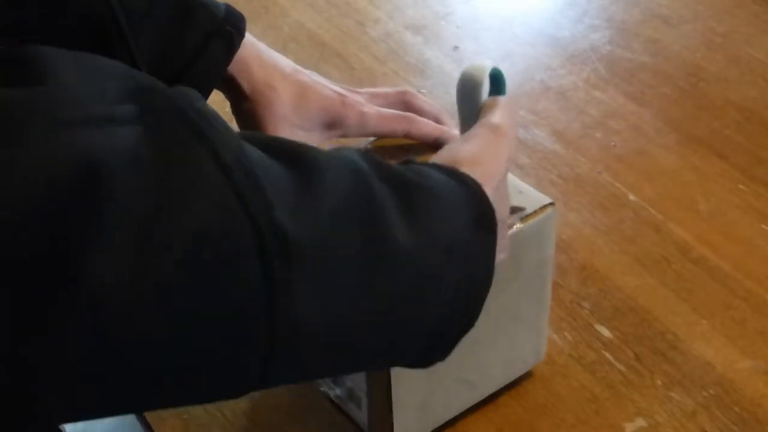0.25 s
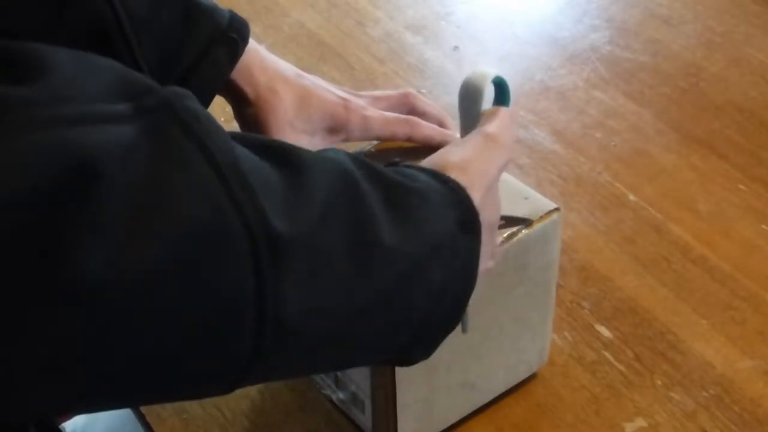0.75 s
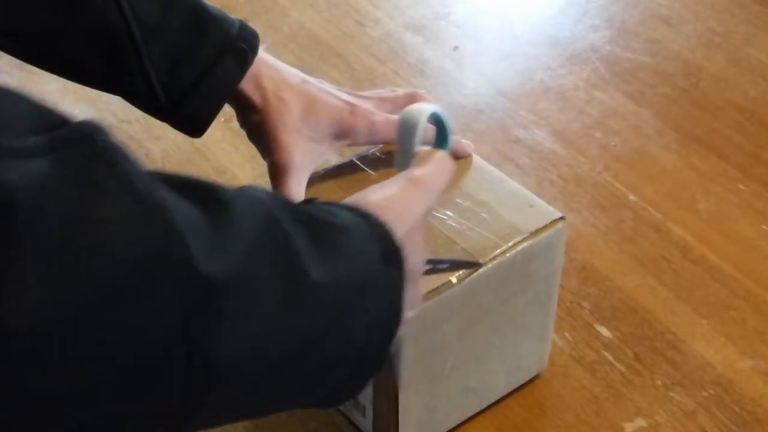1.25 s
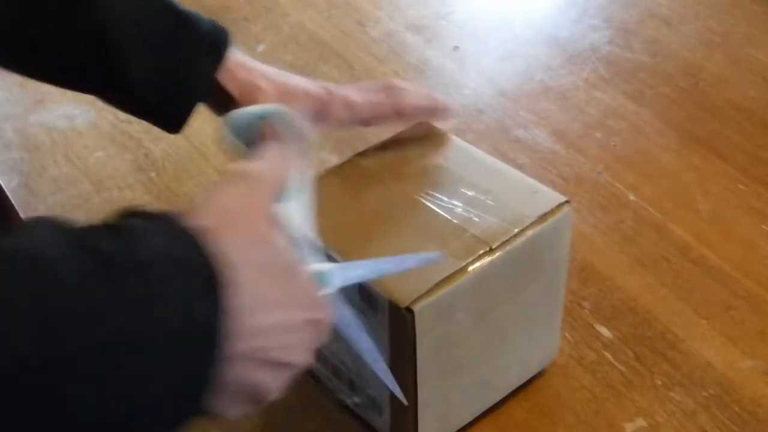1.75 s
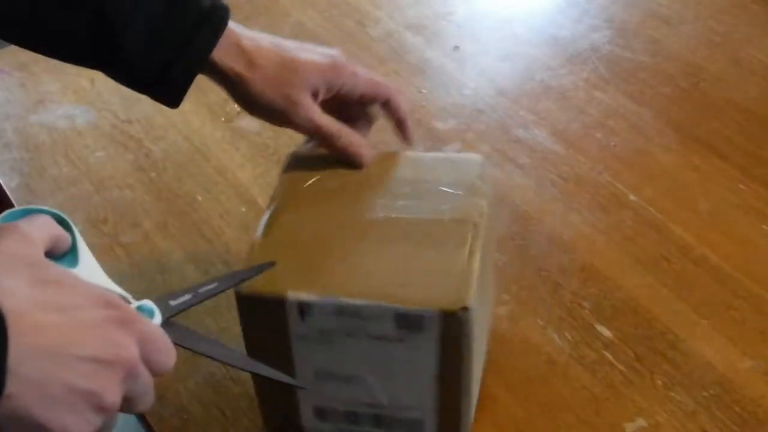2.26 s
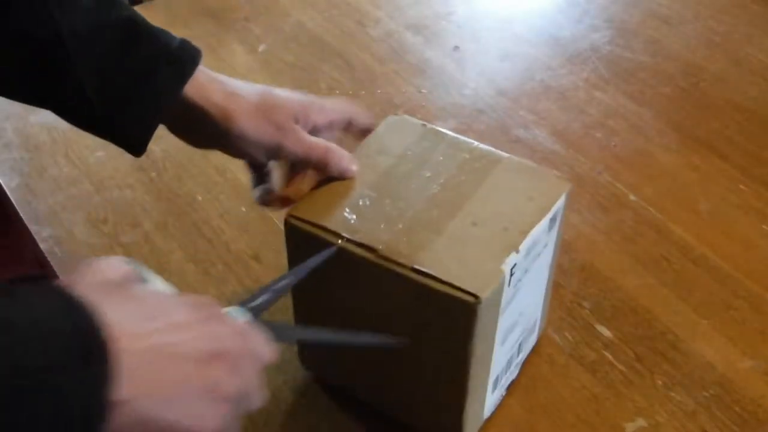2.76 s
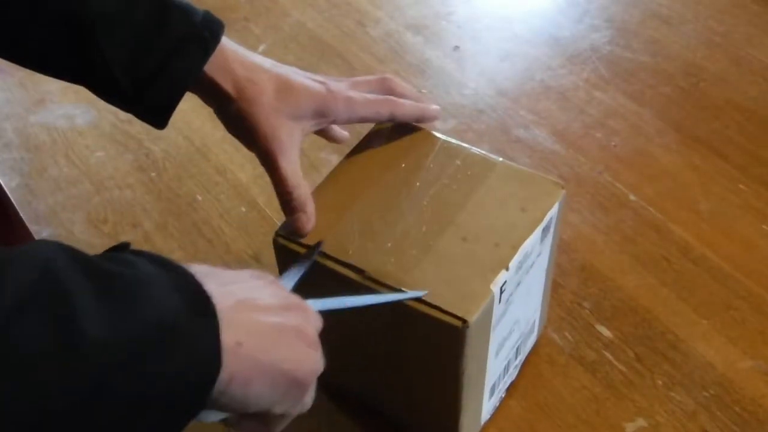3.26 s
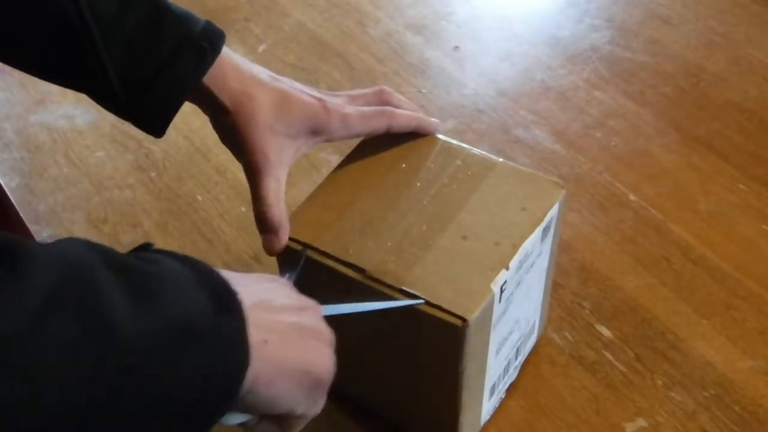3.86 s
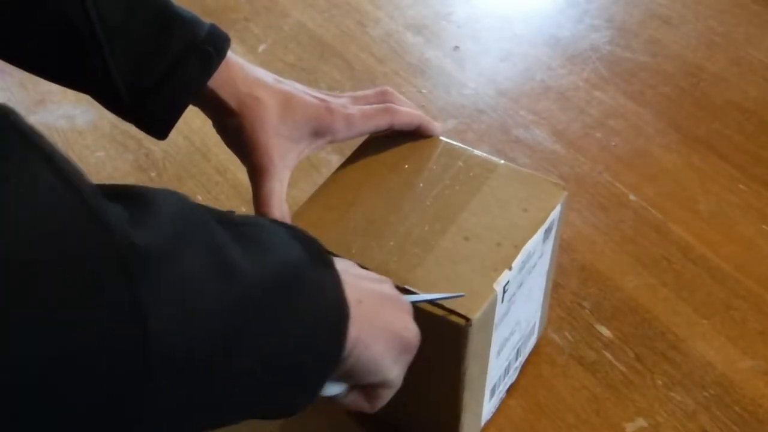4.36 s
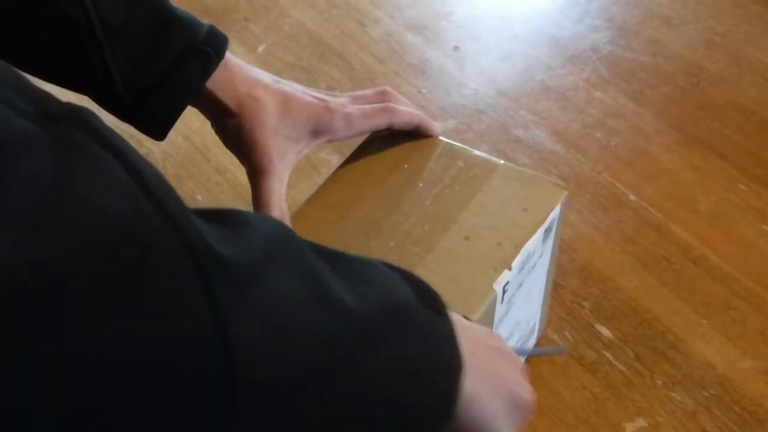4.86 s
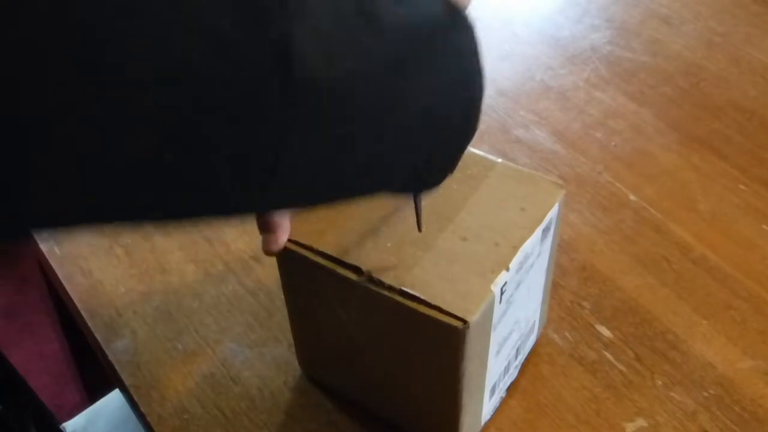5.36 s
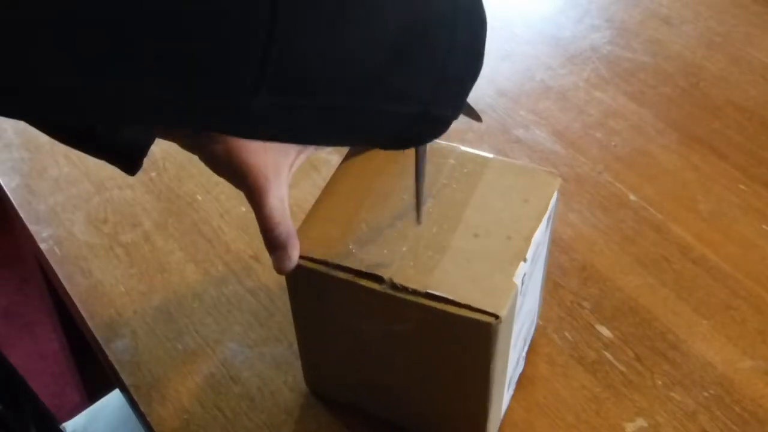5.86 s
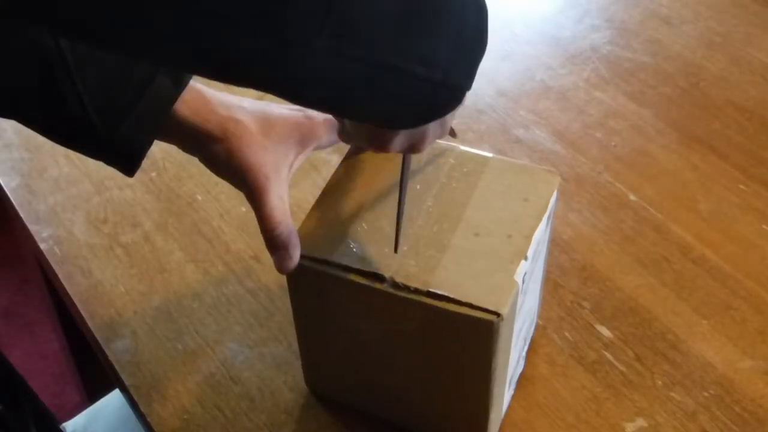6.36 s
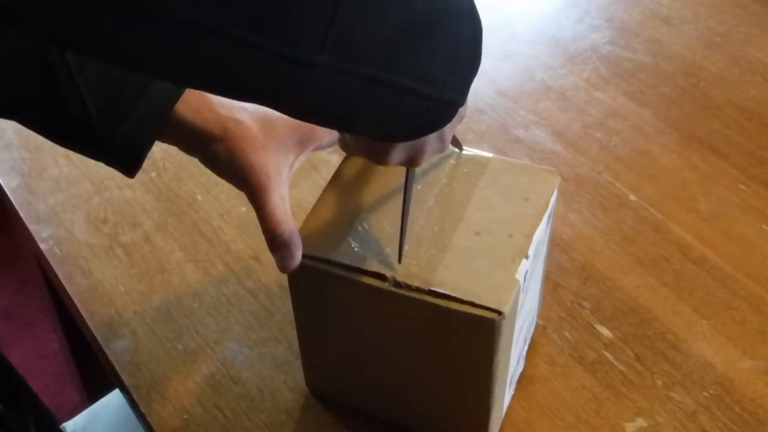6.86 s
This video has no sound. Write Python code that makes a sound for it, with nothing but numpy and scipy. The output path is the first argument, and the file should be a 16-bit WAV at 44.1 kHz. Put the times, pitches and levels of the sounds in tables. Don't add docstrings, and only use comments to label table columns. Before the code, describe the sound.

A scissor blade works through tape on a small hollow carton on a wooden table. Faint rubs, then a crackling slit ending in bright snaps; the box is turned with papery rustling; a lone sharp snap, a harder burst of cuts, a quiet gap, and a last jerky cut. Close small camera microphone, small indoor room, faint hum.

```python
import sys
import numpy as np
from scipy import signal
from scipy.fft import rfft, irfft
from scipy.io import wavfile
from scipy.ndimage import uniform_filter1d

SR = 44100
rng = np.random.default_rng(int(sys.argv[2]) if len(sys.argv) > 2 else 0)


def pcm_store(signal):
    levels = np.round(np.clip(np.atleast_2d(signal), -1, 1) * 32767)
    wavfile.write(sys.argv[1], SR, levels.astype(np.int16).T)


def linear_from_db(decibels):
    return 10 ** (np.asarray(decibels, float) / 20)


N = 313551
GAIN_STEP = 64


def evened(x):
    return x / np.sqrt(np.mean(x ** 2) + 1e-20)


def read(points, hz):
    point_hz, value = np.transpose(points)
    return np.interp(np.log(hz + 1), np.log(point_hz + 1), value)


def add(mix, start_s, sound):
    part = mix[round(start_s * SR):][:len(sound)]
    part += sound[:len(part)]


def colour(x, points):
    hz = abs(np.fft.fftfreq(4096, 1 / SR))
    log_gain = np.log(linear_from_db(np.maximum(read(points, hz), -100)))
    delay_phase = signal.hilbert(log_gain).imag
    taps = np.fft.ifft(np.exp(log_gain - 1j * delay_phase)).real[:2048]
    return signal.oaconvolve(x, taps / np.linalg.norm(taps))[:len(x)]


def resonate(x, hz, width):
    turn = np.exp(2j * np.pi * np.cumsum(hz * np.ones(len(x))) / SR)
    r = np.exp(-np.pi * width / SR)
    smoothed = signal.lfilter([1 - r], [1, -r], x / turn + 1e-18)
    return 2 * (turn * smoothed).real


def resonate_twice(x, hz, width):
    return resonate(resonate(x, hz, width), hz, width)


def body(x, modes):
    return evened(sum(linear_from_db(db) * resonate_twice(x, hz, 1.48 * width) for hz, width, db in modes))


def slips(per_s, spread_db, ring_ms, smooth):
    size = linear_from_db(spread_db * np.minimum(rng.exponential(1, N), 3))
    size = size * (rng.random(N) < per_s / SR)
    swelling = signal.lfilter([.1], [1, -.9], size)
    puffs = signal.lfilter([1], [1, -np.exp(-1000 / (SR * ring_ms))], swelling)
    return (evened(puffs) + smooth) * rng.standard_normal(N)


def wander(count, span):
    once = uniform_filter1d(rng.standard_normal(count), span)
    return evened(uniform_filter1d(once, span))


def moving(drive, modes):
    rings = []
    for hz, width, db in modes:
        drifting_hz = hz * (1 + .025 * wander(len(drive), span=3000))
        flickering_db = db + 3.0 * wander(len(drive), span=900)
        rings.append((drifting_hz, width, flickering_db))
    return body(drive, rings)


def stroke_gain(rows, column):
    t, rows = np.arange(N) / SR, np.array(rows)
    db = np.full(N, -100.)
    inside = (t >= rows[0, 0]) & (t <= rows[-1, 0])
    db[inside] = np.interp(t[inside], rows[:, 0], rows[:, column])
    return linear_from_db(uniform_filter1d(db, 200))


def swell(peak_s, db, rise_s, fall_s):
    t = np.arange(0, N + GAIN_STEP, GAIN_STEP) / SR - peak_s
    return linear_from_db(db - 20 * np.maximum(-t / rise_s, t / fall_s))


def swipe(start_s, length_s, first_db, last_db):
    touch_s, lift_s = 0.032, 0.062
    t = np.arange(0, N + GAIN_STEP, GAIN_STEP) / SR - start_s
    edge = np.maximum(np.maximum(-t / touch_s, (t - length_s) / lift_s), 0)
    slide_db = np.interp(t, [0, max(length_s, .01)], [first_db, last_db])
    return linear_from_db(slide_db - 20 * edge)


def together(gains):
    total = np.linalg.norm(gains, axis=0)
    return np.interp(np.arange(N) / GAIN_STEP, np.arange(gains.shape[1]), total)


# pitch_hz, level_db (per Hz)
ROOM_TONE = [(12, -45), (20, 0.0), (137, -4.5), (202, -5.0), (266, -5.5), (333, -8.0), (478, -10.5),
             (534, -9.5), (857, -12.0), (1670, -9.5), (2090, -18), (3640, -17.5), (5850, -19.5),
             (15500, -23.5), (17000, -29.0)]
# pitch_hz, width_hz, level_db
CAMERA_WHIRR = [(1237, 130, -2), (1643, 160, -2.5), (3458, 120, -10)]


def room_hum():
    air_db, whirr_db = -59, -66
    hz = np.fft.rfftfreq(N, 1 / SR)
    air = irfft(rfft(rng.standard_normal(N)) * linear_from_db(read(ROOM_TONE, hz)), N)
    return linear_from_db(air_db) * evened(air) + linear_from_db(whirr_db) * body(rng.standard_normal(N), CAMERA_WHIRR)


# pitch_hz, time_to_fall_60_db_s
ROOM_DECAY = [(200, 0.39), (1500, 0.25), (8000, 0.19)]


def room_echo(x):
    taps = np.zeros(SR // 2)
    at = np.arange(150, SR // 2 - 20, 20)
    taps[at + rng.integers(0, 20, len(at))] = rng.choice([-1., 1.], len(at))
    hz, t, z = signal.stft(taps, SR, nperseg=128)
    fading = linear_from_db(-60 * t / read(ROOM_DECAY, hz)[:, None])
    tail = signal.istft(z * fading, SR, nperseg=128)[1]
    return signal.fftconvolve(x, tail / np.linalg.norm(tail))[:N]


# peak_s, level_db, rise_s, fall_s, upper_mode_db (against the low mode)
LEANS = [(.2, -54.5, 0.093, 0.09, -14), (.45, -61, 0.12, 0.068, -1), (.9, -60, 0.17, 0.6, 6),
         (1.424, -52, 0.55, .2, 2), (2.15, -59, 0.31, 0.26, -12), (2.35, -80, 0.27, 1.5, 12.5),
         (3.08, -59, 0.096, 0.14, -7), (3.714, -63, 0.092, 0.26, -22), (3.934, -81.5, 0.29, 0.53, 20),
         (4.14, -54.5, 0.028, 0.24, -2), (4.592, -58, 0.35, 0.23, 4), (4.906, -54, 0.086, 0.16, 3),
         (5.1, -85.5, 0.33, 0.83, 22.5), (7.12, -50.5, 0.28, .1, 4), (6.6, -75, .7, .4, 5)]
# pitch_hz, width_hz
TABLE_MODES = [(112, 16.3), (235, 18.6)]


def table_top():
    shake = slips(per_s=30, spread_db=2.0, ring_ms=20, smooth=2.5)
    leans = np.array([swell(*row[:4]) for row in LEANS])
    upper_leans = leans * linear_from_db(np.array(LEANS)[:, 4:])
    gains = together(leans), together(upper_leans)
    return sum(gain * body(shake, [(hz, width, 0)]) for gain, (hz, width) in zip(gains, TABLE_MODES))


# start_s, peak_db, pitch_hz, time_to_fall_60_db_s
KNOCKS = [(0.141, -43, 292, 0.044), (0.382, -43, 203, 0.012), (0.814, -44, 244, 0.061),
          (1.411, -33.5, 234, 0.082), (3.0526, -35.5, 476, 0.044), (4.262, -49.5, 359, 0.14),
          (3.697, -49, 108, 0.24), (4.1228, -34.5, 197, 0.066), (4.433, -50, 337, 0.17),
          (6.658, -43.5, 515, 0.024), (6.8426, -38, 392, 0.014), (6.925, -34.5, 488, 0.031)]


def knocks():
    out, t = np.zeros(N), np.arange(9000) / SR
    stretches = rng.uniform(0.85, 0.91, (len(KNOCKS), 3))
    for (start_s, db, hz, t60_s), stretch in zip(KNOCKS, stretches):
        ring = np.sin(2 * np.pi * hz * t) * linear_from_db(-60 * t / t60_s)
        for ratio, share in zip(stretch * [1.45, 2.2, 3.3], [.3, .25, .15]):
            ring += share * np.sin(2 * np.pi * hz * ratio * t) * linear_from_db(-60 * ratio * t / t60_s)
        add(out, start_s, linear_from_db(db) * ring * np.minimum(t / 0.00051, 1))
    return out


# start_s, length_s, first_db, last_db, cardboard_db (against rustle)
RUBS = [(0.0, 0.43, -70, -66, 2), (.222, .004, -67, -68, 2), (.25, .004, -66, -68, -20),
        (0.753, .004, -63, -68, -20), (0.502, 0.3, -80, -73, 7), (.8, .08, -55, -58, -20),
        (1.625, 0.061, -48, -50, -9.5), (1.69, 0.03, -43, -52, -17), (1.767, 0.18, -56, -64, -22),
        (2.013, 0.041, -60, -65, 1.5), (2.064, 0.074, -49.5, -51, -8.5), (2.159, 0.077, -47.5, -49.5, -9),
        (2.269, 0.24, -53.5, -47.5, -8), (2.533, 0.094, -61, -51.5, -6), (2.637, 0.091, -55, -56, -11),
        (2.77, 0.15, -63.5, -68, -12), (3.048, 0.04, -57.5, -68, -1), (3.151, 0.021, -56.5, -66, -5.5),
        (3.317, 0.041, -59, -59, -23), (3.367, 0.11, -65, -56.5, -10), (3.692, 0.083, -51, -81, 0),
        (3.86, 0.067, -65, -66, -4), (3.955, 0.035, -59.5, -59, -8), (3.995, .03, -59, -68, -2),
        (4.05, 0.045, -64, -66, -7), (4.122, 0.053, -50, -62.5, -0.5), (4.235, 0.23, -57.5, -70, -1),
        (4.988, 0.096, -52.5, -61.5, -7), (5.104, 0.11, -58.5, -60, -7.5), (5.2, 0.19, -60, -66.5, -8),
        (5.418, 0.24, -55, -61.5, -6)]
# peak_s, sheen_db, rise_s, fall_s
FAST_SWIPES = [
    (2.48, -58, 0.17, 0.042),
    (3.155, -64, .04, .04),
    (3.35, -62, .08, .1),
    (4.47, -60, 0.045, 0.16),
    (4.748, -58, 0.018, .05),
]
# time_s, pitch_hz
BRIGHT_PEAK = [(0, 5500), (2.2, 5930), (2.5, 5170), (2.75, 6050), (7.12, 6040)]
# pitch_hz, level_db (per Hz)
RUSTLE = [(1470, -26.5), (2500, -6), (4450, -3), (4810, -0.5), (6190, 0.5), (7820, -5), (10500, -11.5),
          (13600, -22), (22000, -120)]
# pitch_hz, level_db (per Hz)
SHEEN = [(7500, -40), (9000, -8), (12000, -12), (14500, -13), (16500, -12)]
# pitch_hz, level_db (per Hz)
SCUFF = [(180, -36.5), (300, 0), (337, 0.5), (895, -6.5), (1240, 2), (2600, -11.5), (3380, -31),
         (5720, -120)]


def rubbing():
    drive = slips(per_s=1300, spread_db=3.0, ring_ms=1.9, smooth=1.0)
    peak_hz = np.interp(np.arange(N) / SR, *np.transpose(BRIGHT_PEAK))
    peak = evened(resonate(drive, peak_hz, 940))
    rustle = evened(evened(colour(drive, RUSTLE)) + 0.5 * peak)
    swipes = np.array([swipe(*row[:4]) for row in RUBS])
    rub_gain = together(swipes)
    scuff_gain = together(swipes * linear_from_db(np.array(RUBS)[:, 4:]))
    sheen_gain = linear_from_db(-77) * (rub_gain / linear_from_db(-55)) ** 0.6
    sheen_gain = sheen_gain + together(np.array([swell(*row) for row in FAST_SWIPES]))
    sheen = sheen_gain * evened(colour(drive, SHEEN))
    scuff = scuff_gain * evened(colour(drive, SCUFF))
    return rub_gain * rustle + sheen + scuff


# start_s, length_s, slip_rate_hz, level_db
SQUEAK = (2.064, .018, 580, -46)


def squeak():
    start_s, length_s, slip_hz, db = SQUEAK
    t = np.arange(round(length_s * SR)) / SR
    turns = slip_hz * t
    tone = np.sin(2 * np.pi * turns)
    tone += 1.2 * np.sin(4 * np.pi * turns + 1)
    tone += .3 * np.sin(6 * np.pi * turns)
    hiss = colour(np.exp(-4 * (turns % 1)) * rng.standard_normal(len(t)), RUSTLE)
    judder = evened(tone) * np.hanning(len(t)) * 1.35 + evened(hiss)
    out = np.zeros(N)
    add(out, start_s, linear_from_db(db) * judder * signal.windows.tukey(len(t), .4))
    return out


# peak_s, peak_db, fade_ms, pitch_hz, width_hz
SINGS = [(1.02, -58, 50, 6200, 500), (1.2, -53.5, 80, 4800, 450), (1.2, -62, 55, 5740, 398),
         (1.285, -62, 35, 10800, 600), (1.34, -58, 57, 11400, 600), (1.33, -64, 80, 12700, 550),
         (1.32, -66, 100, 13900, 550), (1.32, -52, 50, 5140, 450), (1.371, -54, 60, 6170, 400),
         (1.441, -52, 43, 5970, 400), (1.6, -70, 44, 9500, 800), (1.52, -60, 41, 3400, 300),
         (1.73, -55, 30, 6000, 700), (2.07, -48, 11, 1200, 249), (2.07, -59, 14, 7500, 2000),
         (2.18, -58, 41, 6530, 700), (2.225, -58, 34, 6200, 600), (3.088, -54, 28, 457, 60),
         (3.085, -61, 37, 6200, 600), (3.155, -55.5, 28, 5960, 600), (3.32, -56.5, 20, 6270, 600),
         (3.39, -58, 47, 6200, 500), (3.44, -64, 65, 5200, 700), (3.46, -63, 40, 3200, 2500),
         (4, -59, 9.4, 2200, 400), (4.945, -44, 27, 6140, 970), (7.045, -54, 35, 2700, 200),
         (6.985, -53, 25, 2630, 200), (7.04, -64, 54, 5970, 500), (7.09, -55, 51, 9200, 600)]


def singing():
    out, t = np.zeros(N), np.arange(-6000, 6000) / SR
    noises = rng.standard_normal((len(SINGS), len(t)))
    for (peak_s, db, fade_ms, hz, width), noise in zip(SINGS, noises):
        ring = evened(resonate_twice(noise, hz, width))
        add(out, peak_s + t[0], ring * linear_from_db(db - 20 * (1000 * t / fade_ms) ** 2))
    return out


# start_s, peak_db, pitch_hz, fizz_db, cardboard_db (last two against peak)
SNAPS = [(0.2857, -37, 5430, -22, -28), (0.3195, -43.5, 4180, -18, -28), (0.8132, -22.5, 5540, -26, -14),
         (0.8534, -25.5, 6650, -22, -30), (0.919, -28.5, 5600, -20, -28), (0.9874, -27, 7100, -24, -34),
         (1.1188, -32, 5500, -20, -28), (1.135, -33.5, 10800, -8, -28), (1.3645, -32, 5890, -18, -28),
         (1.412, -22, 6250, -10, -18), (1.571, -44, 6400, -24, -28), (1.6475, -16.5, 5270, -20, -10.5),
         (1.6677, -22, 5400, -19, -18), (1.6855, -18, 5800, -19, -22), (1.701, -27, 5200, -20, -16),
         (1.701, -29, 4200, -26, -4), (1.715, -19, 6350, -23, -35), (1.7593, -31, 5250, -24, -19),
         (1.7705, -20.5, 5370, -21, -34), (2.036, -50, 11000, -4, -30), (2.764, -46, 6160, -18, -28),
         (3.6818, -17, 6560, -17, -18), (3.9338, -37, 8200, -9, -28), (3.9977, -28.5, 5870, -15, -24),
         (4.0801, -40, 6160, -26, -31), (4.4047, -34.5, 6060, -5, -28), (4.4702, -29, 8100, -4, -28),
         (4.538, -18, 5970, -15, -25), (4.558, -30, 6300, -16, -12), (4.746, -35, 11500, -6, -30),
         (4.979, -25.5, 5700, -24, -28), (6.9912, -23.5, 6430, -26, -24), (7.044, -38, 9150, -22, -30)]
TICKS = [(0.052, -40.5, 6300, -24, -5.5), (0.3765, -43.5, 6060, -12, 3), (0.792, -23, 6000, -9.5, -7),
         (0.976, -30.5, 6270, -14, -10.5), (1.075, -26.5, 5900, -22, -11), (1.6535, -25.5, 5900, -8, -6),
         (1.6744, -27, 4800, -18, -3.5), (1.6873, -27, 5500, -14, -12), (1.774, -27, 5100, -22, -5.5),
         (1.8598, -35.5, 7150, -18, -9), (2.6233, -35, 5430, -20, -19), (3.0527, -36, 6100, -24, -12),
         (3.887, -45, 6070, -18, -14), (3.991, -40, 4500, -20, -5), (4.111, -41, 5500, -24, -22),
         (4.1198, -20, 6360, -12, -7.5), (4.129, -45, 6600, -26, -20), (4.45, -33, 6000, -18, -12),
         (4.468, -22.5, 6300, -10, -9), (4.4795, -26, 6200, -6, -15), (4.489, -24, 6030, -16, -11),
         (4.5072, -21.5, 6200, -4, -8), (4.5154, -26, 6300, -6, -8), (4.551, -38, 4780, -18, -4),
         (4.5636, -22, 6100, -18, -13), (4.581, -24, 5000, -6, -8), (4.6864, -31.5, 4230, -26, -8),
         (4.7343, -27, 5170, -18, -6), (4.823, -32, 7500, -22, -22), (4.844, -28, 6800, -20, -6),
         (6.484, -46, 6040, -18, -9), (6.6559, -35.5, 4700, -16, -5.5), (6.7394, -29, 5500, -6, -9),
         (6.925, -17, 6400, -16, -11), (6.9992, -20.5, 6630, -21, -15)]
BRUSHES = [(0.44, -44, 5810, -18, -1.5), (0.7366, -48, 5070, -18, -8), (0.805, -37, 5800, -26, -12),
           (0.826, -39, 6000, -26, -13), (0.868, -38, 6500, -22, -24), (0.9, -49, 5300, -24, -16),
           (1.595, -45, 6500, -20, -10), (1.634, -40, 5925, -16, -1), (1.657, -30, 4400, -22, -11),
           (1.754, -34, 6000, -8, -2.5), (2.009, -44, 5500, -20, -11), (2.0878, -32.5, 6650, -24, -14),
           (2.113, -33.5, 5800, -24, -17), (2.1527, -40, 6720, -20, -1), (2.502, -43, 5440, -22, 3.5),
           (2.6579, -37, 3500, -24, -16), (3.042, -49, 6500, -24, -20), (3.2832, -44, 5300, -18, -5),
           (3.3079, -47, 6200, -22, -14), (3.6856, -27, 7000, -22, -16), (3.6906, -27, 6400, -20, -24),
           (4.229, -44, 4480, -5, -3), (4.2474, -47, 4390, -20, -9), (4.283, -48, 6000, -14, -7),
           (4.3182, -38.5, 4950, -9, -4), (4.4422, -36, 5100, -20, -2), (4.67, -45, 6000, -24, -5),
           (4.7068, -34.5, 4650, -26, -2), (4.7942, -32, 4800, -14, -5), (4.8768, -31, 4500, -16, -7),
           (4.902, -35, 4500, -16, -5), (5.001, -40, 6860, -22, -5), (5.4153, -41, 3430, -22, -2),
           (5.4243, -36, 2330, -26, -14), (5.8667, -46.5, 4840, -20, -9), (6.674, -49, 5540, -22, -14),
           (6.752, -48, 5200, -24, -12), (6.8414, -43.5, 5500, -22, -0.5), (6.897, -50, 6500, -22, -20)]
CLICK_DECAYS = [0.65, 1.3, 2.1]
# pitch_hz, level_db (per Hz)
FILM = [(470, -43), (800, -19.5), (1820, -16.5), (2470, -16), (3300, 2.5), (4150, 1), (6380, 4.5),
        (9500, -19), (12500, -21), (16500, -32)]
# pitch_hz, level_db (per Hz)
FIZZ = [(7500, -42), (9000, -3), (11000, 11), (13500, -1), (17000, -3)]
# pitch_hz, level_db (per Hz)
CARDBOARD = [(400, -19.5), (1000, -1.5), (1900, 5), (2600, 2.5), (4500, -20.5)]


def snaps():
    out, size, lead_s = np.zeros(N), 1500, .004
    film_delay_s, card_delay_s = 0.00019, 0.00073
    t = np.arange(size) / SR - lead_s
    kinds = zip((SNAPS, TICKS, BRUSHES), CLICK_DECAYS)
    rows = np.array([(*row, decay_ms) for table, decay_ms in kinds for row in table])
    noise = rng.standard_normal((len(rows), size))
    strain = .06 * np.exp(-abs(t) / .0011) + .5 * np.exp(-abs(t) / .0001)
    release = np.exp(-1000 * abs(t) / rows[:, 5:])
    release = release + .9 * np.exp(-abs(t) / .00015) + .06 * np.exp(-abs(t) / .0035)
    bursts = (np.sign(noise) + .5 * noise) * np.where(t < 0, strain, release)
    bursts += linear_from_db(-10) * np.roll(bursts, round(.0012 * SR), axis=1)
    click = signal.unit_impulse(size)
    parts = []
    for spectrum in (FILM, FIZZ, CARDBOARD):
        parts.append(signal.fftconvolve(bursts, colour(click, spectrum)[None], axes=1)[:, :size])
    for (start_s, db, hz, fizz_db, card_db, _), burst, wide, fizz, card in zip(rows, bursts, *parts):
        film = 0.34 * evened(wide) + evened(resonate_twice(burst, hz, 2460))
        bright = film / abs(film).max() + linear_from_db(fizz_db) * fizz / abs(fizz).max()
        add(out, start_s + film_delay_s - lead_s, linear_from_db(db) * bright)
        add(out, start_s + card_delay_s - lead_s, linear_from_db(db + card_db) * card / abs(card).max())
    return out


# time_s, tearing_db, pressure_db
CUTS = [
    [(0.761, -77, -86), (0.806, -63, -83), (0.86, -58, -69), (1.025, -48.5, -53), (1.105, -50.5, -54),
     (1.419, -46, -50.5), (1.53, -53, -56.5), (1.56, -65, -73), (1.619, -72, -73)],
    [(4.425, -73, -61), (4.437, -44.5, -44.5), (4.477, -40.5, -41.5), (4.522, -43.5, -44.5),
     (4.567, -42.5, -41.5), (4.594, -44.5, -44), (4.608, -57, -63), (4.65, -56.5, -59), (4.682, -63, -62)],
    [(4.682, -69, -56), (4.707, -64, -51), (4.737, -49.5, -45.5), (4.8, -42.5, -39.5), (4.85, -43.5, -36),
     (4.9, -44, -40.5), (4.951, -39, -40), (5.011, -70, -67), (5.041, -71, -73)],
    [(6.922, -57, -63), (6.935, -52, -48), (6.968, -55, -70), (6.98, -52, -48), (6.997, -42, -47),
     (7.013, -50, -72), (7.027, -51, -53), (7.056, -43.5, -47), (7.12, -47, -47.5)],
]
# pitch_hz, width_hz, level_db
BOX = [(291, 89, -5.5), (186, 85, -10), (530, 65, -12.5)]
# pitch_hz, width_hz, level_db
PANELS = [
    [(574, 55, 5), (835, 180, 9.5), (1220, 130, 4.5), (2090, 84, 6.5)],
    [(655, 620, -5), (1130, 230, 2.5), (2100, 350, 4.5)],
    [(450, 26, 8), (650, 150, 0), (812, 70, 1), (1100, 440, -7.5), (2130, 84, -4)],
    [(532, 105, 5), (1340, 120, -4), (1900, 80, -20)],
]
# pitch_hz, width_hz, level_db
BLADE = [
    [(3560, 110, 0), (4700, 510, -2), (5800, 1100, 3), (11400, 210, -16), (13600, 440, -10)],
    [(4720, 430, -8), (6100, 360, 2)],
    [(3660, 160, 0), (4500, 270, -1), (5700, 150, -8), (7300, 200, -19)],
    [(2700, 190, -1), (3400, 320, -1), (5430, 150, 0), (6050, 250, 4)],
]
GRIT = [0.54, 0.73, 0.72, 0.7]
BOOM_DB = [-46, -48, -51, -48.5]
TOP_DB = [2, -1, -5.5, -4]
# pitch_hz, level_db (per Hz)
CRACKLE = [(880, -28.5), (1500, 9.5), (2240, 3), (4610, 3), (6110, 2), (8000, -2), (11000, -7),
           (14000, -16), (16500, -37)]


def blade():
    full_effort = linear_from_db(-44.5)
    jerky = evened(slips(per_s=1000, spread_db=3.5, ring_ms=1.24, smooth=0.68))
    even = rng.standard_normal(N)
    jerks = slips(per_s=90, spread_db=2.0, ring_ms=8, smooth=1.6)
    out, hollow = np.zeros(N), body(jerks, BOX)
    strokes = zip(CUTS, PANELS, BLADE, GRIT, BOOM_DB, TOP_DB)
    for rows, panels, rings, grit, boom_db, top_db in strokes:
        span = slice(round(rows[0][0] * SR) - 400, round(rows[-1][0] * SR) + 400)
        drive = (grit * jerky + (1 - grit) * even)[span]
        torn = colour(colour(drive, CRACKLE), [(9000, 0), (15000, top_db)])
        crackle = evened(evened(torn) + .4 * moving(drive, rings))
        buzz = evened(moving(drive, panels) + 1.3 * evened(resonate(drive, 1100, 940)))
        tear, press = stroke_gain(rows, column=1)[span], stroke_gain(rows, column=2)[span]
        boom = linear_from_db(boom_db) * (tear / full_effort) ** 0.18 * (press / full_effort) ** 0.26
        out[span] += tear * crackle + press * buzz + boom * hollow[span]
    return out


def scene():
    hits = snaps() + knocks() + squeak()
    strokes = blade() + rubbing() + singing()
    echo = linear_from_db(-14.0) * room_echo(hits) + linear_from_db(-18.0) * room_echo(strokes)
    mono = hits + strokes + echo + table_top() + room_hum()
    return np.array([mono, mono])


def low_pass(x):
    return signal.sosfilt(signal.butter(12, 16630, fs=SR, output="sos"), x)


# pitch_hz, level_db
BAND_EDGE = [(15750, 0), (15850, -40), (17000, -46)]


def record(dry):
    rounded = .16 * np.tanh(dry / .16)
    edge = linear_from_db(read(BAND_EDGE, np.fft.rfftfreq(N, 1 / SR)))
    finished = irfft(rfft(rounded) * edge, N)
    return low_pass(finished)


dry = scene()
out = record(dry)
pcm_store(out)
```